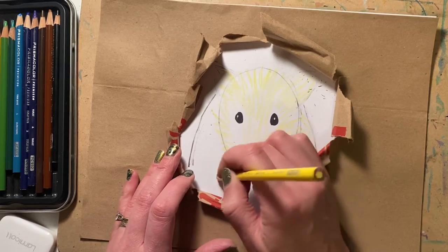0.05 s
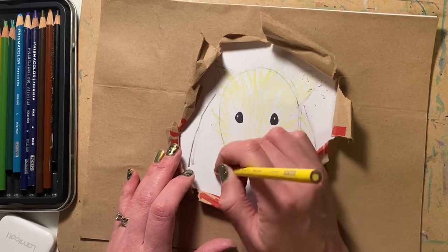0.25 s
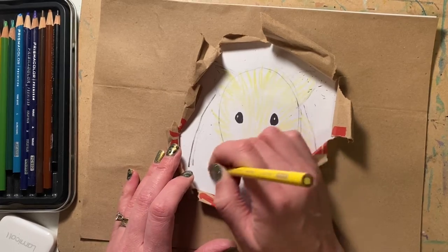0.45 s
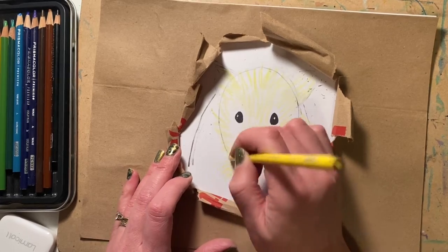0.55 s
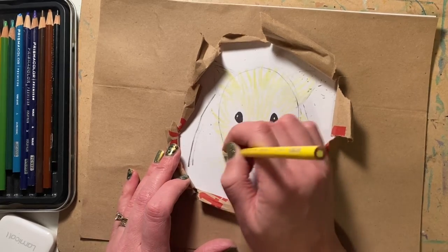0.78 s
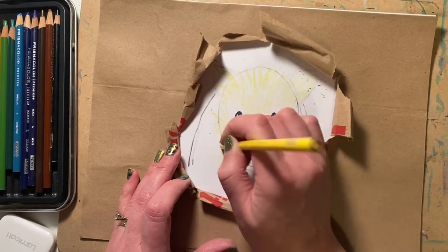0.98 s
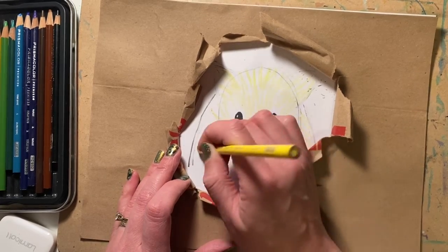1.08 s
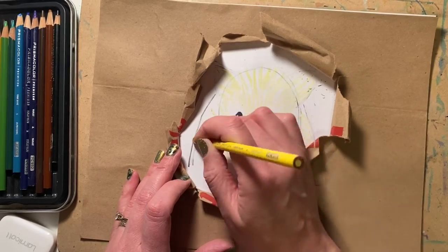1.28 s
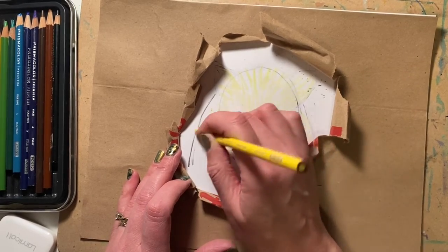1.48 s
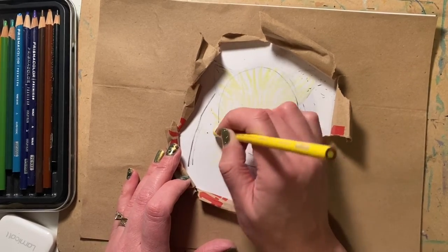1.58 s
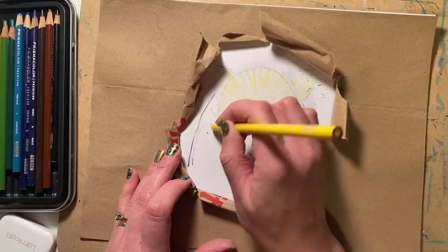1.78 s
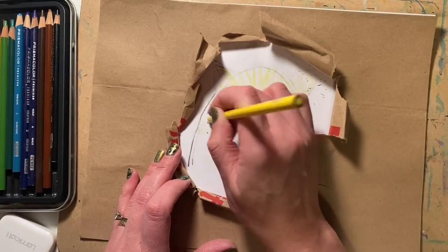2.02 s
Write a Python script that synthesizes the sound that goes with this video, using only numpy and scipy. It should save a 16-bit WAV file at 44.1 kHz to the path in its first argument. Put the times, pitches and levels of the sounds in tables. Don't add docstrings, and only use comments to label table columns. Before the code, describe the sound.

Rapid pencil scribbling on paper, about five knocking, scratchy strokes a second, close in a quiet room

```python
import sys
import numpy as np
from scipy import signal
from scipy.fft import rfft, irfft
from scipy.io import wavfile
from scipy.ndimage import uniform_filter1d

SR = 44100
rng = np.random.default_rng(int(sys.argv[2]) if len(sys.argv) > 2 else 0)


def to_wav(sig):
    pcm = np.clip(np.atleast_2d(sig), -1, 1) * 32767
    pcm = np.round(pcm).astype(np.int16)
    wavfile.write(sys.argv[1], SR, pcm.T)


def decibels_to_gain(level_db):
    exponent = np.asarray(level_db, float) / 20
    return 10 ** exponent


N = 90404


def level(x):
    return x / np.sqrt(np.mean(x ** 2))


def colour(x, points):
    hz, db = np.array(points, float).T
    f = np.maximum(np.fft.rfftfreq(N, 1 / SR), 1)
    gain_db = np.interp(np.log(f), np.log(hz), db, left=-60, right=-60)
    return level(irfft(rfft(x) * decibels_to_gain(gain_db), N))


def band(x, hz, width_hz):
    return signal.lfilter(*signal.iirpeak(hz, hz / width_hz, fs=SR), x)


def tilt(x, hz, db):
    low = signal.filtfilt(*signal.butter(2, hz, fs=SR), x)
    return decibels_to_gain(-db) * low + decibels_to_gain(db) * (x - low)


def walk(rate_hz):
    k = int(SR / rate_hz)
    steps = np.repeat(rng.standard_normal(N // k + 1), k)
    smooth = uniform_filter1d(uniform_filter1d(steps, k), k)
    return level(smooth[:N])


def grain(spread_db, patchy_db, rate_hz):
    size = rng.exponential(size=N).clip(0, 4)
    return rng.standard_normal(N) * decibels_to_gain(spread_db * size + patchy_db * walk(rate_hz))


def ring(modes, t, hold):
    t = t.clip(0)
    return -sum(decibels_to_gain(db - 60 * t / (t60 * hold)) * np.sin(2 * np.pi * hz * t) for hz, db, t60 in modes)


def add(out, start_s, x):
    i = int(round(start_s * SR))
    out[i:i + len(x)] += x[:N - i]


# pitch_hz, level_db
HUM = [(48, -72), (220, -71)]
# pitch_hz, level_db
ROOM_HISS = [(15, 10), (30, 4.5), (130, -3), (400, -11.5), (1000, -7.5), (5000, -17), (11000, -15.5),
             (16000, -19)]


def room():
    hum = sum(decibels_to_gain(db) * level(band(rng.standard_normal(N), hz, 19)) for hz, db in HUM)
    hiss_db = -61 + walk(5.05)
    return hum + decibels_to_gain(hiss_db) * colour(rng.standard_normal(N), ROOM_HISS)


# time_s, peak_db
SNAGS = [
    (.8655, -52),
    (1.058, -49),
    (1.072, -47),
    (1.085, -55),
    (1.2177, -41),
    (1.2372, -42),
    (1.338, -55),
    (1.6927, -53),
]


def snags():
    out, t = np.zeros(N), np.arange(int(.012 * SR)) / SR
    swell = np.sin(np.pi * np.clip(t / 0.0042, 0, 1)).clip(0)
    for time_s, peak_db in SNAGS:
        crack = band(rng.standard_normal(len(t)), 6800, 16000) * swell
        add(out, time_s - .001, decibels_to_gain(peak_db + 1.5) * crack)
    return out


# start_s, length_s, pitch_hz, level_db
CHIRPS = [
    (0.22, 0.097, 2140, -67.5),
    (1.4, 0.052, 2440, -55),
    (1.063, 0.036, 3570, -58),
    (1.574, 0.027, 1560, -50),
    (0.064, 0.22, 5020, -68.5),
]


def chirps():
    t, out = np.arange(N) / SR, np.zeros(N)
    for start_s, length_s, hz, db in CHIRPS:
        swell = np.sin(np.pi * np.clip((t - start_s) / length_s, 0, 1))
        out += decibels_to_gain(db) * swell * level(band(rng.standard_normal(N), hz, 150))
    return out


# start_s, length_s, rumble_db, hiss_db
DRAGS = [(-.08, .11, -45, -54.5), (.13, .11, -49.5, -55), (.335, .11, -48.5, -54),
         (.54, 0.13, -50.5, -53.5), (.755, 0.12, -48.5, -54), (.965, 0.11, -46.5, -53),
         (1.175, 0.094, -44, -49), (1.38, .10, -46.5, -55.5), (1.585, 0.081, -45.5, -54),
         (1.785, 0.11, -51.5, -56.5), (1.99, 0.21, -51, -50)]
# start_s, length_s, rumble_db, hiss_db
RETURNS = [
    (0.028, 0.11, -70, -68.5),
    (.24, 0.056, -70, -63.5),
    (0.443, 0.085, -71, -63.5),
    (0.665, 0.076, -70, -57.5),
    (0.862, 0.12, -67, -60),
    (1.057, 0.1, -63, -59),
    (1.263, 0.11, -66.5, -63),
    (1.486, 0.068, -63, -60),
    (1.666, .105, -59.5, -60),
    (1.881, 0.12, -65.5, -60.5),
]


def hand():
    t = np.arange(N) / SR
    press, speed, light = np.zeros(N), np.zeros(N), np.zeros(N)
    for rows, fastest, is_return in ((DRAGS, 0.56, 0), (RETURNS, 0.45, 1)):
        for start_s, length_s, rumble_db, hiss_db in rows:
            u = np.clip((t - start_s) / length_s, 0, 1)
            bend = u ** (np.log(.5) / np.log(fastest))
            hump = np.sin(np.pi * bend).clip(0) ** 1.34
            edge = np.clip(u / 0.042, 0, 1) * np.clip((1 - u) / 0.36, 0, 1)
            press += decibels_to_gain(rumble_db - 1.5 * (u + 0.5)) * edge
            speed += decibels_to_gain(hiss_db) * (hump + decibels_to_gain(-13.5) * edge)
            light += is_return * decibels_to_gain(hiss_db) * hump
    return press, speed, light


# pitch_hz, level_db
RUMBLE = [(59, -56), (100, -5), (189, -20.5), (336, -7.5), (540, -8), (646, -2.5), (989, 0), (1700, -5.5),
          (5000, -30), (6500, -53), (11000, -120)]
# pitch_hz, level_db
HISS = [(2500, -24), (3500, -9), (5300, -15.5), (8700, 0.5), (11800, 3), (13300, -1.5), (14400, -2.5),
        (16000, 0)]
# pitch_hz, width_hz, level_db
PAPER = [(636, 36, 2), (788, 20, 4.5), (984, 40, -2), (1393, 25, -12.5), (1697, 20, 0), (2050, 30, -2)]
# time_s, hiss_tilt_db, rumble_tilt_db
BRIGHT = [(0, -4, 2), (.7, -3, 4.5), (1.0, -2.5, 0.5), (1.3, -3, -0.5), (1.6, -1, -1), (2.05, 0.5, 1)]
RUMBLE_PATCHY_DB = 1.2


def strokes():
    press, speed, light = hand()
    at, hiss_tilt_db, rumble_tilt_db = np.array(BRIGHT, float).T
    t = np.arange(N) / SR

    fibres = grain(0.87, RUMBLE_PATCHY_DB, 90)
    resonances = sum(decibels_to_gain(db) * band(colour(fibres, RUMBLE), hz, width) for hz, width, db in PAPER)
    rumble = level(1.34 * colour(fibres, RUMBLE) + resonances)
    rumble = tilt(rumble, 950, np.interp(t, at, rumble_tilt_db))
    linger = signal.lfilter([.0015], [1, -(1 - .0015)], press)

    fine_grain = level(grain(3.2, 1.2, 150))
    hiss = colour(0.2 * level(fibres) + fine_grain, HISS)
    lift_db = np.interp(t, at, hiss_tilt_db)
    sheen = decibels_to_gain(-4 + 2 * lift_db) * band(hiss, 11700, 1200)
    hiss = tilt(hiss, 10000, lift_db) + sheen

    squeak = level(band(rng.standard_normal(N), 3330, 400))
    return (press + 0.21 * linger) * rumble + speed * hiss + decibels_to_gain(-7) * light * squeak


# time_s, knock_db, tick_db, softness_lowpass_hz, rebound_db
TAPS = [
    (.1270, -20, -45.5, 2440, -1),
    (.3313, -17, -41.5, 3200, -2),
    (.5390, -16.5, -40.5, 2780, -3),
    (0.7532, -16.5, -44, 2820, -1.5),
    (.9630, -18, -42, 2270, -1.5),
    (1.1715, -17.5, -41.5, 1880, 0),
    (1.3786, -21.5, -43, 1600, 2.1),
    (1.5834, -21.5, -45, 1540, 1),
    (1.7816, -24.5, -49, 1230, 1.5),
]
# pitch_hz, level_db, ring_time_s
BARREL = [(1213, 2.5, 0.0089), (1730, -8, 0.0065), (2624, -16.5, 0.0073), (3300, -11, 0.0046)]
# pitch_hz, level_db, ring_time_s
REBOUND = [(424, -8.5, 0.012), (862, 2, 0.0072)]
# pitch_hz, level_db, ring_time_s
SLAP = [(1050, -9, 0.013), (1500, 0.5, 0.0054)]
# pitch_hz, level_db, ring_time_s
DESK = [(51, -41.5, 0.04), (134.2, -27.5, 0.28), (275.4, -30.5, 0.27), (373, -36, 0.18), (503, -29, 0.15),
        (783, -27, 0.029)]


def taps():
    out, t = np.zeros(N), np.arange(int(.2 * SR)) / SR
    rattle = colour(grain(1.83, RUMBLE_PATCHY_DB, 130), RUMBLE)
    tick_hz = 10500
    for time_s, knock_db, tick_db, soft_hz, rebound_db in TAPS:
        hard = soft_hz / 2900
        blow = ring(BARREL, t, hard)
        rebound = decibels_to_gain(rebound_db) * ring(REBOUND, t - 0.002158, 0.9)
        slap = hard ** 2 * ring(SLAP, t - 0.003416, 1)
        knock = signal.lfilter(*signal.butter(2, 318, "high", fs=SR), blow - rebound - slap)

        i = int(time_s * SR)
        tail = rattle[i:i + len(t)] * decibels_to_gain(-17 - 60 * t / 0.14) * np.clip(t / 0.0026, 0, 1)
        body = knock + ring(DESK, t, 0.75) + tail
        body = signal.lfilter(*signal.butter(3, 0.89 * soft_hz, fs=SR), body)
        add(out, time_s + 0.0004, decibels_to_gain(knock_db) * body)

        tick = np.sin(2 * np.pi * tick_hz * t) + band(rng.standard_normal(len(t)), tick_hz, 5000)
        add(out, time_s, decibels_to_gain(tick_db + 7 - 60 * t / .003) * tick)
    return out


def scene():
    return (room() + snags() + chirps() + strokes() + taps())[None]


def band_limit(x):
    return signal.sosfilt(signal.butter(12, 16810, fs=SR, output="sos"), x)


def record(dry):
    x = signal.sosfilt(signal.ellip(6, .2, 24, 15650, fs=SR, output="sos"), dry)
    return band_limit(x)


dry = scene()
out = record(dry)
to_wav(out)
```